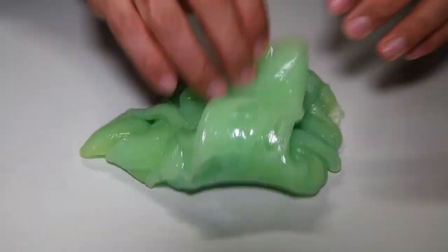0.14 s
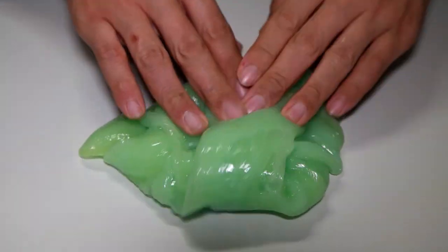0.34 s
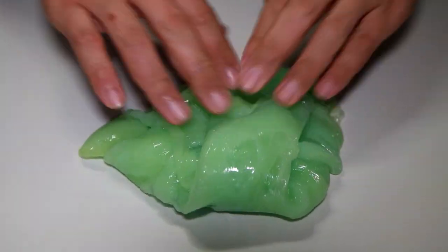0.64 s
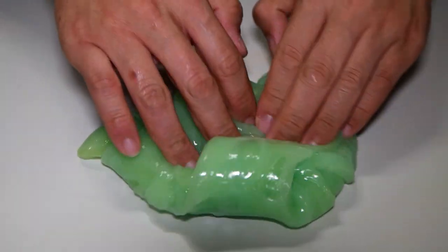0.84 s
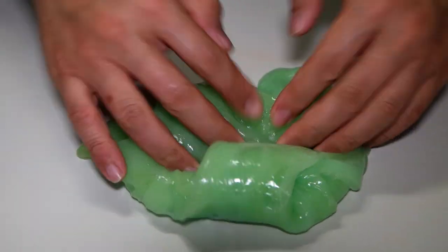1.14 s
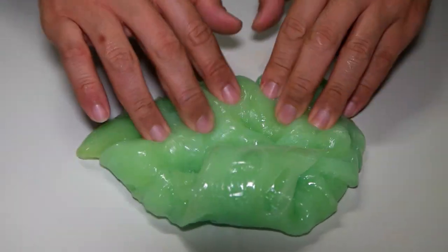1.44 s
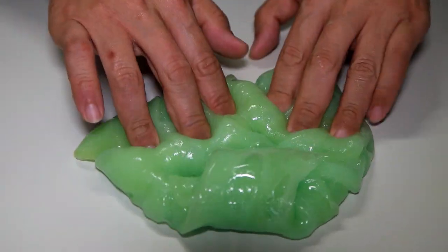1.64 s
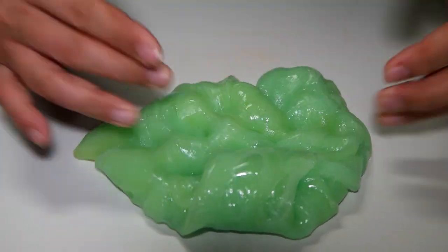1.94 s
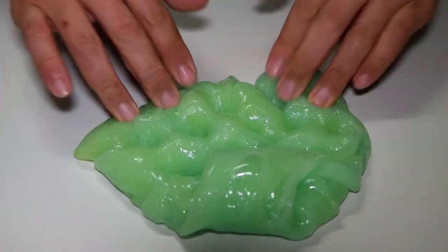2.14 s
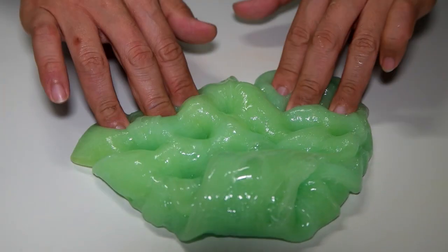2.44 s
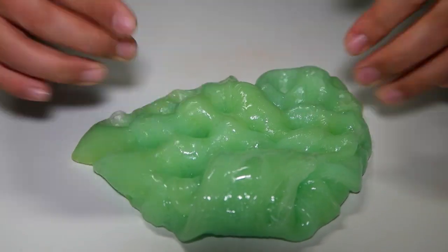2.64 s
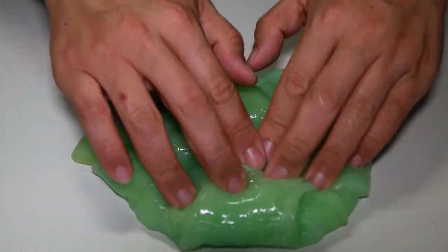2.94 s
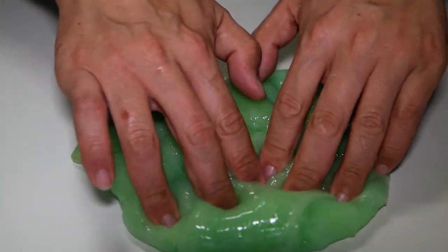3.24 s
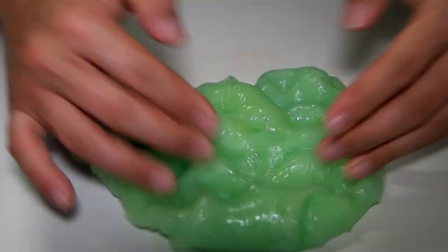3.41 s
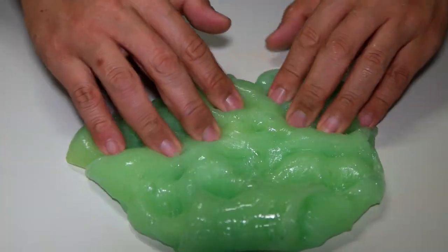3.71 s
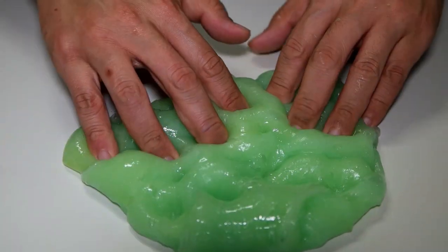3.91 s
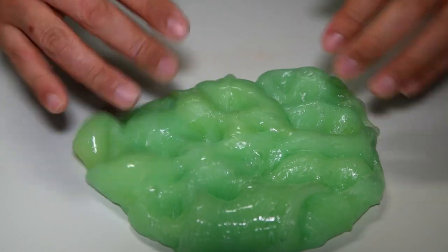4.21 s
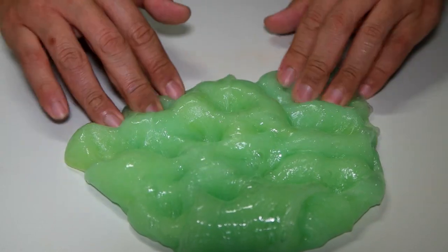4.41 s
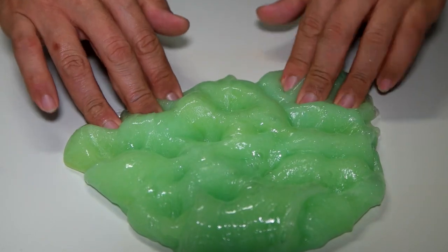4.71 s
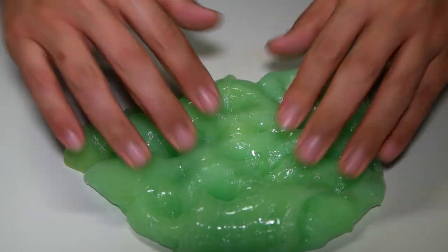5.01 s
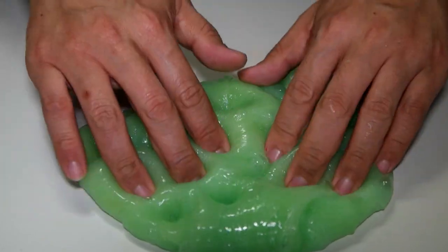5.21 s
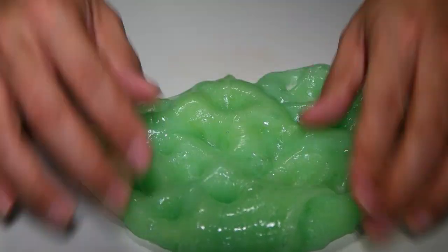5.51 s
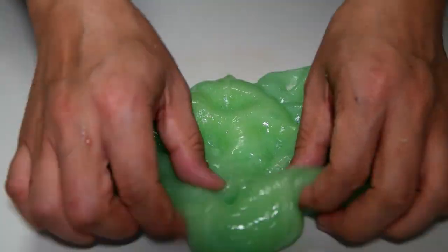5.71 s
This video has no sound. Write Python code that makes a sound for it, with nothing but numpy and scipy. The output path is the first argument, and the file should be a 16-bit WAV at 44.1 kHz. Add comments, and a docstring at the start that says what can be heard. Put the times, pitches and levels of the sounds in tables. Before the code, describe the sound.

Sticky slime pressed and pulled by hand, with irregular bursts of wet crackles, sharp clicks and small pops in a quiet room.

```python
"""A lump of sticky slime on a table in a small room, close to a stereo microphone.
Over quiet hiss and mains hum, fingers press in with a soft crackle and a few small ticks. From about
one second they pull free again and again: the skin crackles as it peels, thin strands snap and finger
holes pop as small air pockets, and the room rings after each release. The sharpest snaps come just
before two seconds, the table knocks dully just before four, and light presses end the scene."""
import sys
import numpy as np
from scipy import signal
from scipy.fft import rfft, irfft, next_fast_len
from scipy.io import wavfile
from scipy.ndimage import uniform_filter1d

SR = 44100
rng = np.random.default_rng(int(sys.argv[2]) if len(sys.argv) > 2 else 0)


def unload_wav(signal):
    """Save mono or channel-first audio to the path in sys.argv[1] as 16-bit WAV at rate SR, clipped to [-1, 1]."""
    wavfile.write(
        sys.argv[1],
        SR,
        np.round(np.clip(np.atleast_2d(signal).T, -1, 1) * 32767).astype(np.int16),
    )


N = 258426


def gain_of(db):
    return 10 ** (np.asarray(db) / 20)


def unit_rms(x):
    return x / np.sqrt(np.mean(x ** 2) + 1e-20)


def curve_at(points, hz):
    f, value = np.transpose(points)
    return np.interp(np.log(hz + 1), np.log(f + 1), value)


def add(mix, start_s, sound):
    part = mix[..., round(start_s * SR):][..., :sound.shape[-1]]
    part += sound[..., :part.shape[-1]]


def burst(t, rise_s, fall_db_per_s):
    """Envelope with a soft start and an exponential fall, peaking at 1."""
    t = np.maximum(t, 0)
    shape = (1 - np.exp(-t / rise_s)) ** 2 * gain_of(-fall_db_per_s * t)
    return shape / shape.max()


# Colour of the hiss. Each row: frequency in Hz, relative level in dB.
HISS_SPECTRUM = [(20, -13), (45, -12), (80, -21), (140, -11), (200, -6), (300, -5), (450, -2), (820, -5),
                 (1450, -5.5), (5000, -11), (15100, -21), (17000, -48)]
# Its likeness in the two channels. Each row: frequency in Hz, left-right correlation.
HISS_LIKENESS = [(40, -0.078), (240, 0.63), (950, 0.28), (3800, -0.064), (15000, 0.14)]
def hiss(rms_db=-54.5):
    """Room and microphone hiss with faint patches drifting in its spectrum."""
    frames, hz = N // 512 + 5, np.fft.rfftfreq(2048, 1 / SR)
    a, b, c, d, patches = rng.standard_normal((frames, 1025, 5)).T
    patches = unit_rms(uniform_filter1d(uniform_filter1d(patches, 30, 0), 8, 1))
    likeness = curve_at(HISS_LIKENESS, hz)[:, None]
    left = a + 1j * b
    right = likeness * left + np.sqrt(1 - likeness ** 2) * (c + 1j * d)
    spectra = np.array([left, right]) * gain_of(curve_at(HISS_SPECTRUM, hz)[:, None] + .8 * patches)
    return gain_of(rms_db) * unit_rms(signal.istft(spectra, nperseg=2048, noverlap=1536)[1][:, :N])


# Hum in the room, heard in the centre. Each row: frequency in Hz, rms level in dB.
HUM_TONES = [(60.3, -75), (120.5, -76.5), (181, -79.5), (200, -76)]
def mains_hum():
    """Low tones wavering in level and phase, the higher ones more."""
    out, t = np.zeros(N), np.arange(N) / SR
    for hz, db in HUM_TONES:
        waver = unit_rms(uniform_filter1d(rng.standard_normal(N), 6000)) * hz / 150
        out += np.sqrt(2) * gain_of(db + 3.1 * waver) * np.sin(2 * np.pi * hz * t + .68 * waver)
    return out


# Ring of the small room. Each row: frequency in Hz, seconds to fall 60 dB.
ROOM_DECAY = [(250, 0.54), (700, 0.43), (1800, 0.44), (4600, 0.47), (12000, 0.28)]
# Its strength at the microphone. Each row: frequency in Hz, level against the direct sound in dB.
ROOM_LEVEL = [(250, -3), (1000, -8), (4000, -12.5), (12000, -4.5)]
# Its stereo width. Each row: frequency in Hz, side against middle in dB.
ROOM_WIDTH = [(150, -20), (1000, -4.5), (6000, 1.5)]
def room_ring(source):
    """The walls answer after 8 ms with echoes of random sign, each band dying at its own speed."""
    taps = np.zeros((2, SR // 2))
    slots = np.arange(360, SR // 2 - 20, 20)
    at = slots + rng.integers(0, 20, (2, len(slots)))
    np.put_along_axis(taps, at, rng.choice([-1., 1.], at.shape), 1)
    hz, t, spectra = signal.stft(taps, SR, nperseg=256)
    decay = gain_of(-60 * t / curve_at(ROOM_DECAY, hz)[:, None])
    tail = signal.istft(spectra * decay, SR, nperseg=256)[1]
    tail[:, :slots[0]] = 0
    tail /= np.linalg.norm(tail[0])
    size = next_fast_len(N + tail.shape[1])
    hz = np.fft.rfftfreq(size, 1 / SR)
    mid, side = rfft(source, size) * rfft(tail, size) * gain_of(curve_at(ROOM_LEVEL, hz))
    side *= gain_of(curve_at(ROOM_WIDTH, hz))
    return irfft(np.array([mid + side, mid - side]), size)[:, :N]


# Surfaces near the microphone. Each row: delay in ms, level in dB, left over right in dB.
NEAR_ECHOES = [(2.2, -19.5, 17), (7.35, -22.5, -21), (9.3, -22.5, 14)]
def near_echoes(source):
    """Each nearby surface returns one slightly dulled echo."""
    out = np.zeros((2, N))
    dulled = signal.lfilter(*signal.butter(1, 9000, fs=SR), source)
    for ms, db, pan_db in NEAR_ECHOES:
        add(out, ms / 1000, dulled * gain_of(db + pan_db * np.array([[.5], [-.5]])))
    return out


# Knocks through the table. Each row: start in seconds, peak in dB, pitch in Hz, seconds to fall 60 dB.
KNOCKS = [(3.694, -40, 70, 0.15), (3.749, -40.5, 83, 0.12), (3.819, -50, 68.4, 0.34)]
def table_knocks():
    """The table top booms briefly at its lowest mode, with a weaker overtone, just left of centre."""
    out, t = np.zeros(N), np.arange(SR // 2) / SR
    for start, db, hz, t60 in KNOCKS:
        tone = np.sin(2 * np.pi * hz * t) + .16 * np.sin(2 * np.pi * 152 * t)
        add(out, start, gain_of(db) * tone * burst(t, .012, 60 / t60))
    return out * gain_of([[.7], [-.7]])


# Fingers pushing in. Each row: start and length in seconds, relative level in dB, brightness 0 to 1.
PRESSES = [(0.247, 0.24, -59, 0.68), (0.606, 0.16, -54, 0), (0.768, .24, -52, 0.39),
           (1.695, 0.32, -44.5, 0.39), (2.278, 0.12, -52, .45), (2.42, 0.076, -47, 0.08),
           (3.323, 0.14, -49, 0.59), (3.925, 0.17, -54, 0.3), (5.643, 0.086, -42, 0.57),
           (5.717, 0.072, -48.5, 0.6), (5.802, 0.058, -43.5, 0.27)]
# Fingers ripping free. Each row: start and hold in seconds, relative level in dB, brightness 0 to 1.
TEARS = [(1.153, .006, -30, 0.36), (1.185, 0.019, -30.5, 0.44), (1.709, 0.028, -33, 0.25),
         (1.857, 0.0194, -32, 0.28), (1.896, .015, -34.5, .4), (1.929, 0.0156, -30.5, .35),
         (2.559, 0.0049, -30, 0.66), (2.588, 0.0076, -30, 0.68), (3.3841, .055, -30, 0.55),
         (4.068, .065, -28, .55), (4.778, 0.0028, -31.5, .75), (4.803, 0.015, -34.5, 0.71),
         (5.386, 0.0048, -24, 0.48), (5.411, 0.0071, -28.5, 0.48), (5.595, 0.012, -40, 0.29)]
TEAR_RISE_S, TEAR_FALL_DB_PER_S, TEAR_DULLING_PER_S = .0021, 467, 2.73
def peeling():
    """Level and brightness of the crackle: tears jump up, hold, fall and dull; presses swell and fade."""
    level, shine = np.full(N, 1e-9), np.zeros(N)
    t = np.arange(SR // 8) / SR
    for start, hold, db, bright in TEARS:
        shape = np.minimum(t / TEAR_RISE_S, 1) * gain_of(db - TEAR_FALL_DB_PER_S * np.maximum(t - hold, 0))
        add(level, start, shape)
        add(shine, start, shape * (bright - TEAR_DULLING_PER_S * t))
    for start, length, db, bright in PRESSES:
        shape = gain_of(db) * np.sin(np.pi * np.arange(0, length, 1 / SR) / length)
        add(level, start, shape)
        add(shine, start, shape * bright)
    return level, np.clip(shine / level, 0, 1)


def skin_crackle(bands=14, band_grains_per_s=380):
    """A swarm of tiny snaps and pops; brightness shifts the weight from big pockets to thin strands."""
    out, t = np.zeros((2, N)), np.arange(700) / SR
    level, bright = peeling()
    for place, hz in zip(np.linspace(0, 1, bands), np.geomspace(560, 13000, bands)):
        sizes = gain_of(3.07 * np.minimum(rng.exponential(1, N), 5))
        kicks = sizes * (rng.random(N) < band_grains_per_s / SR) * rng.choice([-1, 1], N)
        pan = gain_of(np.array([[3], [-3]]) * rng.standard_normal(N))
        grain = np.sin(2 * np.pi * hz * t) * burst(t, .3 / hz, 7 * hz)
        grain = np.diff(grain, prepend=0)  # a small source radiates no bass
        weight = gain_of(-70 * (place - bright) ** 2)
        out += weight * unit_rms(signal.oaconvolve(kicks * pan, grain[None], axes=1)[:, :N])
    # the lump shoves the table
    shove = unit_rms(signal.lfilter(*signal.butter(2, [90, 380], "band", fs=SR), rng.standard_normal(N)))
    return level * (.33 * out + .054 * shove)


def strays(over_db, low_hz, high_hz, dull_db=0, mean_gap_s=.011):
    """Lesser strands or pockets give way by chance in each tear: rows of start, peak and pitch."""
    rows = []
    for start, hold, db, bright in TEARS:
        wait, size, tone = rng.random((3, 12))
        delay = np.cumsum(-mean_gap_s * np.log(1 - wait))
        fade_db = TEAR_FALL_DB_PER_S * np.maximum(delay - hold, 0) / 2
        peak_db = db + over_db + dull_db * max(.5 - bright, 0) + 4 * (2 * size - 1) - fade_db
        hz = low_hz * (high_hz / low_hz) ** tone
        rows += list(np.transpose([start + delay, peak_db, hz])[delay < hold + .006])
    return rows


# Air pockets left by the fingertips. Each row: start in seconds, peak in dB, pitch in Hz, length in ms.
POPS = [(0.1996, -42.5, 1600, 4.3), (0.2305, -39, 790, 2.6), (0.2308, -26.5, 2020, 1.2),
        (0.255, -43, 1440, 4.5), (0.321, -41, 1770, 3.2), (0.797, -29.5, 1770, 1.8),
        (0.8615, -40.5, 860, 6.1), (0.875, -40, 1520, 1.5), (0.8968, -36.5, 1670, 3.2),
        (0.978, -42, 690, 1.9), (1.1572, -25, 1190, 6.4), (1.1872, -30, 835, 6.8),
        (1.1945, -17, 1900, 0.85), (1.2008, -26, 660, 3.8), (1.2075, -27.5, 2755, 15),
        (1.2235, -20, 900, 1.8), (1.5269, -31, 1720, 0.77), (1.702, -42, 940, 4.4),
        (1.7132, -19, 1520, 0.83), (1.853, -28, 1220, 1), (1.863, -28, 308, 4.7), (1.87, -21, 1250, 1.05),
        (1.8775, -23, 2910, 2.5), (1.9005, -15.5, 776, 6.5), (1.9296, -16.5, 925, 3.8),
        (2.335, -42.5, 940, 2.2), (2.4406, -39.5, 950, 3.9), (2.5611, -22, 1650, 5.7),
        (2.5707, -22.5, 1030, 4.3), (2.5883, -18, 1490, 2.5), (2.5939, -21.5, 945, 4),
        (2.6036, -19.5, 1020, 4.9), (3.0425, -39.5, 2120, 0.94), (3.384, -12, 1770, 1.05),
        (3.4106, -12, 806, 4.7), (3.4916, -34, 714, 1.9), (3.7466, -22.5, 1540, 0.77),
        (4.0412, -44, 1110, 0.58), (4.0811, -19.5, 1882, 1.9), (4.09, -19.5, 712, 8.5),
        (4.1136, -23, 1380, 1.6), (4.1263, -13.5, 1730, 1.7), (4.1315, -23, 790, 3.4),
        (4.26, -20, 2450, 0.97), (4.2625, -29.5, 2840, 5.9), (4.288, -30, 1420, 0.76),
        (4.343, -39, 1360, 2.4), (4.5513, -39.5, 2100, 1.1), (4.7805, -21, 1660, 1.6),
        (4.7835, -14, 2075, 1.05), (4.8081, -32, 934, 2.4), (4.835, -34, 1340, 1.11),
        (5.1468, -26, 1300, 0.85), (5.3909, -12, 1420, 0.89), (5.391, -33.5, 293, 4.1),
        (5.4187, -23.5, 930, 5.5), (5.598, -30.5, 547.5, 4.1), (5.5991, -19.5, 1810, 1.6),
        (5.7494, -33.5, 1790, 0.97)]
def pocket_pops(stray_ms=3):
    """Each pocket opens and rings a few uneven cycles until its soft wall chokes it."""
    out, t = np.zeros((2, N)), np.arange(1198) / SR
    lesser = [(*row, stray_ms) for row in strays(over_db=2.5, low_hz=610, high_hz=2356)]
    for start, db, hz, ms in POPS + lesser:
        ms = max(ms, 1)
        draw = rng.uniform(-1.043, 1, len(t) + 2)
        polarity, side, wobble = np.sign(draw[0]), draw[1], draw[2:]
        bend = 1 + 130 / (hz + 300) * unit_rms(uniform_filter1d(wobble, 40))
        choke = gain_of(-6 * (t * 1000 / ms) ** 2)
        envelope = burst(t, .13 / hz + 2e-5 * ms, 4000 / ms) * choke
        ring = np.sin(2 * np.pi * hz * np.cumsum(bend) / SR) * envelope
        pop = signal.lfilter(*signal.butter(2, hz / 4, "high", fs=SR), ring / abs(ring).max())
        add(out, start, polarity * gain_of(db) * pop * gain_of([[3.1 * side], [-.9 * side]]))
    return out


def snap(hz, ms, pan_db):
    """One strand breaks: a crack, a tick, a frayed trail, louder and earlier in the nearer channel."""
    balance_db = pan_db * np.array([[.5], [-.5]])
    noise = rng.standard_normal((3, 500))
    t = np.arange(500) / SR + 8e-6 * balance_db - 5e-5
    band = signal.butter(2, [.41 * hz, min(1.41 * hz, 16000)], "band", fs=SR)
    spray = unit_rms(signal.lfilter(*band, .7 * noise[0] + .55 * noise[1:]))
    swing = 6.9 * hz * (t - 1e-4)
    crack = -.7 * swing * np.exp(-swing ** 2 / 2)  # one push and pull of air
    tick = (.39 * np.sin(2 * np.pi * hz * t) + .25 * spray) * burst(t, 9e-5, 15000 / max(ms - .15, .15))
    trail = .08 * spray * burst(t, .0005, 10000)
    sound = signal.lfilter(*signal.butter(2, hz / 5, "high", fs=SR), crack + tick + trail)
    sound *= gain_of(balance_db)
    return sound / abs(signal.hilbert(sound.mean(0))).max()


# The clearest strands, close to the microphone. Each row: start in seconds, peak in dB, pitch in Hz.
SNAPS = [(0.2309, -19, 5080), (0.388, -41, 7500), (0.7848, -34, 8280), (0.7903, -30, 13180),
         (0.7972, -30, 9020), (0.8609, -36, 3610), (0.8755, -39, 6500), (0.8973, -33, 5770),
         (0.9605, -38, 7500), (1.1588, -16, 6400), (1.191, -22, 7980), (1.1937, -18, 7750),
         (1.2206, -21, 4880), (1.5273, -33, 3760), (1.8309, -29, 10830), (1.8622, -8, 7350),
         (1.8698, -19, 4950), (1.8797, -11, 3600), (1.8986, -2, 7660), (1.9005, -2, 7400),
         (1.9295, -16, 8830), (2.335, -42, 5000), (2.5621, -19, 3770), (2.5885, -16, 4380),
         (2.5942, -16, 8540), (3.1786, -32, 10070), (3.3834, -17, 5530), (3.4104, -13, 5380),
         (3.4285, -17, 6850), (3.4364, -16, 6050), (3.476, -31, 6500), (3.748, -16, 9260),
         (4.0687, -13, 11160), (4.0701, -11, 3590), (4.082, -14, 8040), (4.0863, -10, 8290),
         (4.0876, -9, 3820), (4.1027, -14, 9250), (4.1063, -14, 8770), (4.1218, -12, 4190),
         (4.2595, -23, 7110), (4.368, -28, 9350), (4.4128, -37, 7170), (4.5518, -31, 4390),
         (4.7792, -17, 4030), (4.7833, -18, 4880), (4.8079, -15, 5490), (4.8168, -19, 5150),
         (4.8345, -23, 7140), (4.9069, -34, 8810), (5.1598, -25, 6460), (5.3918, -7, 4420),
         (5.4125, -9, 5530), (5.4185, -9, 6400), (5.4212, -12, 5840), (5.4264, -21, 6430),
         (5.5985, -25, 7240), (5.7757, -33, 5740)]
def strand_snaps(centre_hz=4500, pan_db_per_octave=-2.5, typical_ms=.55):
    """Strands tear off the skin; the thinner, higher ones tend to sound further right."""
    out = np.zeros((2, N))
    lesser = strays(over_db=13, low_hz=3760, high_hz=8580, dull_db=-55)  # weaker in a dull tear
    for start, db, hz in SNAPS + lesser:
        pan_db = pan_db_per_octave * np.log2(hz / centre_hz) + rng.normal(0, 3.5)
        ms = typical_ms * rng.lognormal(0, .2)
        add(out, start, gain_of(db) * snap(hz, ms, pan_db))
    return out


def scene():
    """The slime up close, with its echoes, the table and the quiet room behind it."""
    slime = strand_snaps() + pocket_pops() + skin_crackle()
    mono = slime.mean(0)
    return slime + near_echoes(mono) + room_ring(mono) + table_knocks() + hiss() + mains_hum()


def record(dry):
    """The recorder clips any peak near full scale and cuts the highest treble."""
    band_limit = signal.firwin(511, 16850, window=("kaiser", 9), fs=SR)
    return signal.oaconvolve(np.clip(dry, -.9, .9), band_limit[None], "same")


dry = scene()
out = record(dry)
unload_wav(out)
```